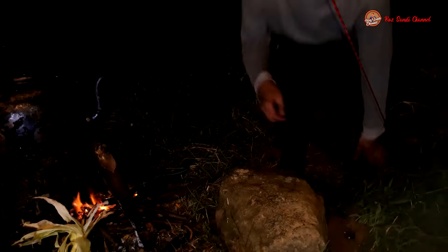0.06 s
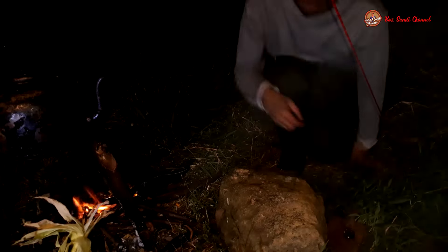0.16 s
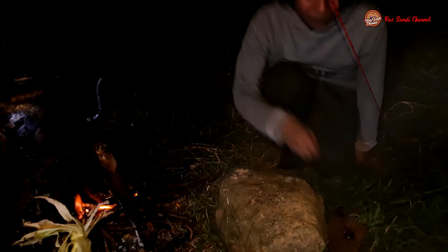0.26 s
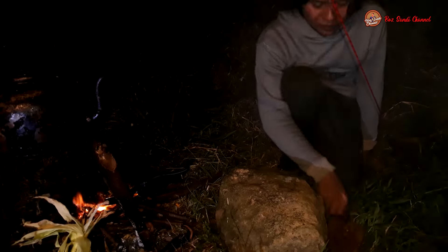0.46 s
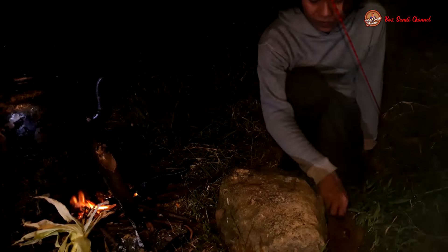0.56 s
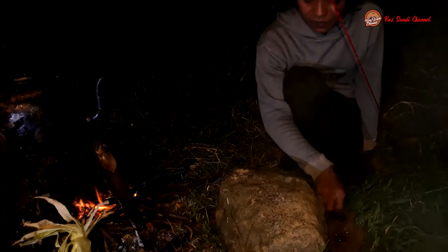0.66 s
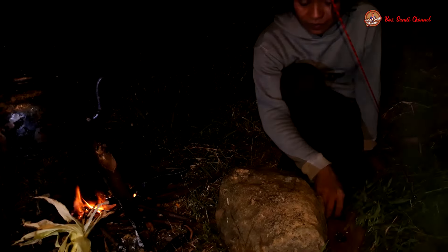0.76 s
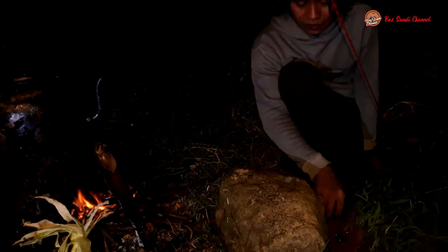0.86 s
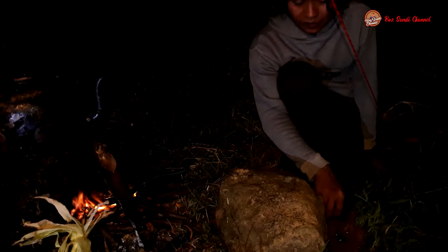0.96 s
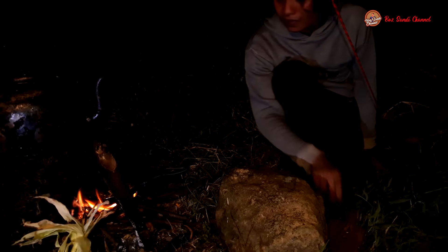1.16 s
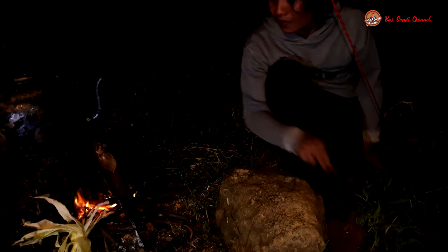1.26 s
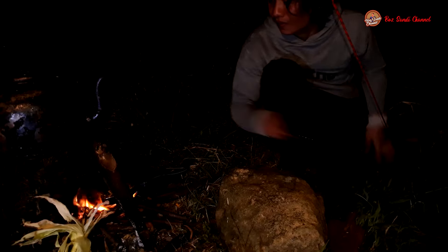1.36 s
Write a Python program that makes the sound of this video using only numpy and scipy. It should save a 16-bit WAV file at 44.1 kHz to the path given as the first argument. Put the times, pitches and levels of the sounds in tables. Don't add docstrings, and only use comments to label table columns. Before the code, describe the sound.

A small campfire crackles with sharp dry pops and thin ticks, faint night insects behind.

```python
import sys
import numpy as np
from scipy import signal
from scipy.fft import rfft, irfft
from scipy.io import wavfile
from scipy.ndimage import uniform_filter1d, map_coordinates

SR = 44100
rng = np.random.default_rng(int(sys.argv[2]) if len(sys.argv) > 2 else 0)


def boost_factor(decibels):
    exponent = np.asarray(decibels, float) / 20
    return 10 ** exponent


def store_pcm(level_fs):
    pcm = np.round(np.clip(level_fs, -1, 1) * 32767).astype(np.int16)
    wavfile.write(sys.argv[1], SR, np.atleast_2d(pcm).T)


N = 61740


def unit(x):
    return x / np.sqrt(np.mean(x ** 2) + 1e-20)


def highpass(x, hz):
    return signal.sosfilt(signal.butter(N=3, Wn=hz, btype="high", fs=SR, output="sos"), x)


def wobble(rate_hz):
    knots = rng.standard_normal(int(N * rate_hz / SR) + 4)
    return map_coordinates(knots, [np.arange(N) * rate_hz / SR])


def rush(spectrum, patchy_db):
    hz, _, z = signal.stft(rng.standard_normal(N), SR, nperseg=1024)
    patches = uniform_filter1d(rng.standard_normal(z.shape), size=8, axis=0)
    patches = unit(uniform_filter1d(patches, size=4, axis=1))
    f, db = np.transpose(spectrum)
    colour_db = np.interp(np.log(hz + 1), np.log(f), db, left=-120, right=-30)
    gain = boost_factor(colour_db[:, None] + patchy_db * patches)
    return unit(signal.istft(z * gain, nperseg=1024)[1][:N])


def place(start_s, shapes):
    first = np.round(np.asarray(start_s) * SR).astype(int)
    at = first[:, None] + np.arange(shapes.shape[1])
    return np.bincount(at.ravel(), shapes.ravel(), N + SR)[:N]


def bursts(start_s, level_db, pitch_hz, life_cycles):
    cycle = np.arange(400) / SR * pitch_hz[:, None]
    life = np.maximum(life_cycles, .05)[:, None]
    decay = np.exp(-np.maximum(cycle - .75, 0) / life)
    onset = np.minimum(cycle / 0.17, 1)
    return place(start_s, boost_factor(level_db)[:, None] * np.sin(2 * np.pi * cycle) * decay * onset)


# pitch_hz, level_db
AIR_COLOUR = [(8000, -36), (9500, -6.5), (11000, -2.5), (13500, 1), (15000, 1), (16000, -17)]


def air(swell_db):
    return boost_factor(-9.5 + swell_db + 0.43 * wobble(15.3)) * rush(AIR_COLOUR, patchy_db=2.0)


CRICKET_HZ, CRICKET_DB = 3570, -7
CRICKET_START_S, CRICKET_PERIOD_S, CRICKET_PULSE_S = .0375, 0.048, .0035


def cricket():
    centre_s = np.arange(CRICKET_START_S, N / SR, CRICKET_PERIOD_S)
    uneven = rng.standard_normal((40, 2))[:len(centre_s)]
    lead_s = .018
    t = np.arange(1600) / SR - lead_s
    pitch_hz = CRICKET_HZ * (1 + 0.01 * uneven[:, 1:])
    pulse = np.exp(-.5 * (t / CRICKET_PULSE_S) ** 2) * np.sin(2 * np.pi * pitch_hz * t)
    return boost_factor(CRICKET_DB) * place(np.maximum(centre_s - lead_s, 0), boost_factor(1.5 * uneven[:, :1]) * pulse)


# pitch_hz, level_db
CHORUS_COLOUR = [(5000, -59), (5500, -9), (6100, -2.5), (7400, 0.5), (8400, 1.5), (9200, -9.5),
                 (10000, -21), (10500, -40)]


def insects(swell_db):
    return boost_factor(swell_db + .6 * wobble(20)) * (rush(CHORUS_COLOUR, patchy_db=.8) + cricket())


# pitch_hz, level_db
FLAME_COLOUR = [(40, -17), (115, -2), (230, -8), (700, -3), (1700, -7), (2650, -1), (4800, -1.5),
                (5600, -7)]


def flame(swell_db):
    return boost_factor(-4 + 1.28 * swell_db + 0.69 * wobble(12.36)) * rush(FLAME_COLOUR, patchy_db=1.5)


# start_s, level_db
SWELL_CURVE = [(0.0, -45.5), (0.108, -43.5), (0.568, -39.5), (0.85, -43.5), (1.154, -45.5), (1.4, -45.5)]


def background_level():
    return np.interp(np.arange(N) / SR, *np.transpose(SWELL_CURVE))


def night(level_db):
    mean_db = level_db.mean()
    swell_db = level_db - mean_db
    return boost_factor(mean_db) * (flame(swell_db) + insects(swell_db) + air(swell_db))


CRACKLE_RATE_HZ, CRACKLE_DB, CRACKLE_SPREAD_DB = 300, -53.5, 3.5
CRACKLE_HZ, CRACKLE_OCTAVES = 3500, 0.84


def crackle(swell_db):
    d = rng.random((600, 4))
    start_s = np.cumsum(-np.log(d[:, 0])) / CRACKLE_RATE_HZ
    inside = start_s < N / SR
    d, start_s = d[inside], start_s[inside]
    pitch_hz = np.clip(CRACKLE_HZ * 2 ** (CRACKLE_OCTAVES * 4 * (d[:, 1] - .5)), 300, 15000)
    louder_db = np.minimum(-CRACKLE_SPREAD_DB * np.log(d[:, 2]), 12)
    life_cycles = 0.17 + 1.1 * d[:, 3] ** 2
    return boost_factor(swell_db) * bursts(start_s, CRACKLE_DB + louder_db, pitch_hz, life_cycles)


# middle_s, half_length_s, level_db
TEARS = [
    (.407, 0.0041, -35),
    (0.434, .005, -35),
    (.6043, .0013, -29),
    (0.5135, 0.0022, -32),
    (0.675, 0.004, -30),
    (1.094, 0.00053, -44),
]


def flurries():
    d, t = rng.random((4000, 4)), np.arange(N) / SR
    pitch_hz = 3500 * 2 ** (2.35 * (d[:, 2] - .5))
    shower = bursts(d[:, 0] * N / SR, -5 * np.log(d[:, 1]), pitch_hz, 0.23 + d[:, 3])
    envelope = sum(boost_factor(db) * np.exp(-((t - middle) / half) ** 2) for middle, half, db in TEARS)
    return unit(shower) * envelope


# start_s, level_db (peak), pitch_hz
FIBRES = [(.0027, -25.5, 13760), (0.045, -29, 12500), (0.089, -37, 12200), (0.0982, -34, 12000),
          (0.1667, -23.5, 12540), (0.2652, -25.5, 13000), (0.509, -37, 12900), (0.513, -33, 12800),
          (.5344, -34, 12800), (0.5519, -24, 13700), (.5732, -30, 12000), (.5766, -27, 12700),
          (0.5904, -22.5, 12040), (.6046, -36, 12500), (0.668, -28, 13700), (.6718, -27, 13400),
          (0.681, -19.5, 14300), (0.7367, -34, 12800), (.7857, -35, 13800), (.8701, -36, 12400),
          (1.0857, -28, 14900), (1.1072, -30.5, 14400), (1.0975, -36, 12200), (1.3123, -34, 12100),
          (1.3271, -39, 13400), (1.3873, -29.5, 12800)]
TICK_S, TICK_TURNS = 0.0002, 1.4


def ticks():
    start_s, level_db, pitch_hz = np.transpose(FIBRES)
    t = np.arange(128) / SR
    stray = np.cumsum(rng.standard_normal((len(start_s), 128)), axis=1) / 4
    phase = 2 * np.pi * pitch_hz[:, None] * t + TICK_TURNS * stray
    puff = (t / TICK_S) * np.exp(1 - t / TICK_S)
    return place(start_s, boost_factor(level_db)[:, None] * np.sin(phase) * puff)


SOFT_TWIG = .5825, -23.5, [(700, -10, .012), (1485, 0, .05), (2155, -2, .04), (2885, -16, .02)]
HARD_TWIG = .6527, -7.5, [(1482, -21, .04), (2150, -17, .025), (2900, -15, .025), (3380, -3, .014),
             (3650, -2, .006), (6000, -19, .004)]


def twig():
    t = np.arange(SR // 10) / SR
    contact = 1 - np.exp(-t / 0.00022)
    starts, rings = [], []
    for start_s, peak_db, modes in (SOFT_TWIG, HARD_TWIG):
        ring = sum(boost_factor(db - 60 * t / t60) * np.sin(2 * np.pi * hz * t) for hz, db, t60 in modes)
        starts.append(start_s)
        rings.append(boost_factor(peak_db) * ring * contact)
    return place(starts, np.array(rings))


# start_s, level_db (peak), pitch_hz, life_cycles Steam pockets bursting, and the sharp
POCKETS = [(.0348, -29.5, 4460, 1), (.1660, -21, 2200, .4), (.2394, -12, 2900, 0.27),
           (.2422, -12.5, 3260, 0.13), (0.2644, -29, 3000, .3), (0.2906, -23.5, 2340, 0.5),
           (0.358, -20, 3650, 2.6), (.3827, -21.5, 3750, 0.18), (.4052, -35, 1220, 4),
           (.4210, -27, 2900, 2), (.4284, -24.5, 3420, 5.7), (0.4319, -27, 2000, 2.5),
           (.5051, -30, 2500, 0.7), (.51034, -11, 4000, 0.12), (0.52244, -14.5, 4100, 0.12),
           (.5241, -19, 3700, .15), (0.6032, -17, 4500, 0.15), (.6044, -19, 6500, .5),
           (.58252, -23, 2000, 0.2), (0.66953, -19, 8000, 1.5), (.6031, -24, 2700, 1),
           (.6034, -22, 7800, 4), (.6046, -27, 1800, .5), (.6052, -23, 5500, .5), (.51066, -24, 7700, 2),
           (.5243, -28, 7800, 2), (.5227, -27, 7000, 1.5), (.4326, -22, 3100, 1.5), (.4352, -28, 3400, 2),
           (.2462, -30, 3500, 2), (.4285, -26, 5700, 2), (.6730, -20, 2600, 2), (0.5903, -27, 3700, 2),
           (.5768, -31, 4000, 1), (0.534, -31, 1990, 0.27), (0.044, -34, 1600, 0.28), (.4042, -30, 2400, 1),
           (.4335, -29, 4000, 3), (.3380, -30, 3300, 0.37)]
BIG_POCKET = [
    (.66946, -2.5, 3900, .6),
    (.66996, -12, 4100, 1.1),
    (.66943, -12, 2200, 1.2),
    (.6700, -20, 1350, 1),
    (.6693, -28, 950, 1),
    (.6717, -13, 4200, 1.2),
    (.6780, -32, 1300, 4),
]
LATE_POCKETS = [(.7180, -28, 3500, 1), (0.7857, -27, 3600, 0.66), (0.8488, -29, 3040, 0.37),
                (0.9076, -37, 2120, .8), (.9500, -24.5, 3980, 1.2), (.9714, -34, 2450, 2.7),
                (1.0348, -30, 3500, .2), (1.0857, -26, 4300, .5), (1.0862, -33, 6000, 2),
                (1.0972, -31, 6900, 2.5), (1.0969, -26.5, 5000, 2.1), (1.0976, -33, 2500, 2.5),
                (1.0973, -30, 4000, 2.4), (1.1073, -32, 4800, 0.8), (1.1152, -34, 3500, .3),
                (1.2898, -30, 2900, .2), (1.313, -31, 4300, .5), (1.3166, -33, 1500, .4),
                (1.3874, -30, 4500, 0.8), (.7555, -29.5, 2500, 0.18)]
LOW_PULSES = [(.2492, -37, 320, .3), (.6701, -42, 330, .6), (.2396, -31, 830, 0.61), (.5104, -37, 300, 0.5),
              (.51022, -23, 1400, 0.6), (.4100, -40, 480, 0.6), (.5111, -26, 2600, .4),
              (.52228, -25, 1500, .5), (.52395, -33, 1500, .5), (.4375, -35, 1050, 2),
              (.4120, -40, 1200, 3)]


def pops():
    early = highpass(bursts(*np.transpose(POCKETS + BIG_POCKET)), 480)
    late = highpass(bursts(*np.transpose(LATE_POCKETS)), 1000)
    return early + late + bursts(*np.transpose(LOW_PULSES))


SCATTER_DB, SCATTER_T60_S, SCATTER_DELAY_S = -12, 0.028, 0.0007


def scatter(x):
    t, size = np.arange(2048) / SR, 441
    count = N // size
    tails = rng.standard_normal((count, 2048)) * boost_factor(-60 * t / SCATTER_T60_S) * (t > SCATTER_DELAY_S)
    tails /= np.linalg.norm(tails, axis=1)[:, None]
    wet = signal.fftconvolve(x[:count * size].reshape(-1, size), tails, axes=1)
    return boost_factor(SCATTER_DB) * highpass(place(np.arange(count) * size / SR, wet), 900)


def scene():
    level_db = background_level()
    fire = crackle(level_db - level_db.mean()) + flurries() + ticks() + twig() + pops()
    fire = highpass(fire, 176)
    return (night(level_db) + fire + scatter(fire))[None]


def roll_off(x):
    return signal.sosfilt(signal.butter(12, 15970, fs=SR, output="sos"), x)


def record(dry):
    heard = rfft(highpass(dry, 54.7))
    below_top = np.fft.rfftfreq(N, 1 / SR) < 15830
    mix = irfft(heard * below_top, N)
    return roll_off(mix)


dry = scene()
out = record(dry)
store_pcm(out)
```